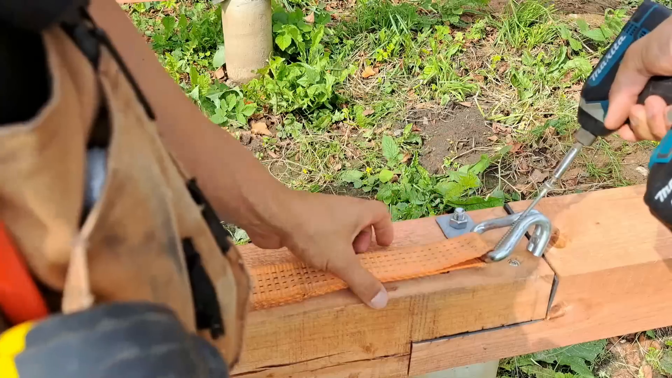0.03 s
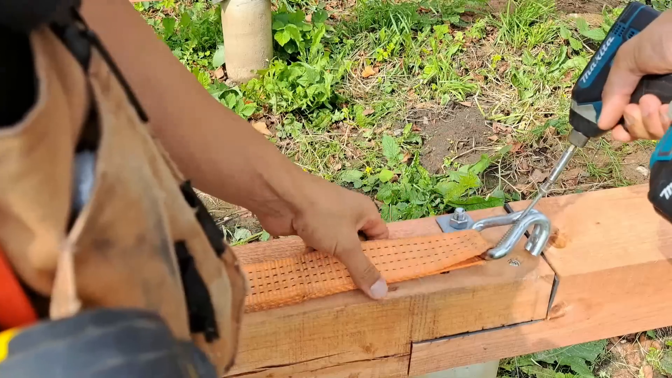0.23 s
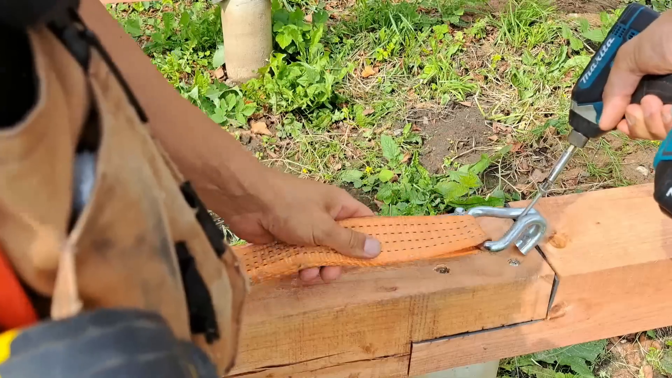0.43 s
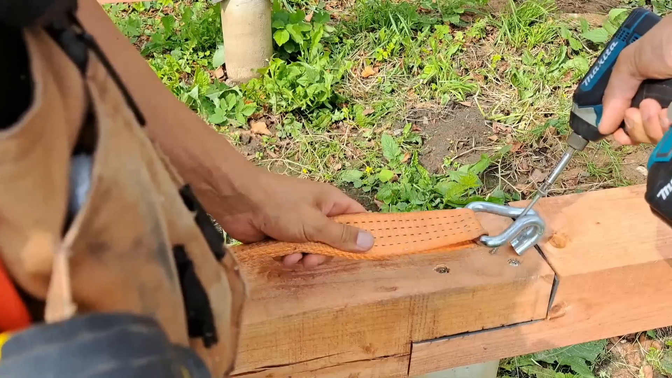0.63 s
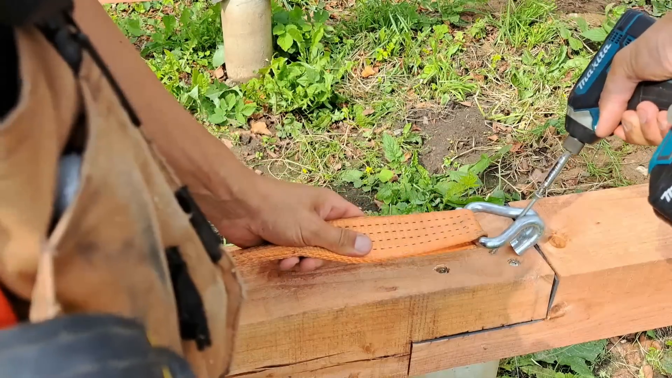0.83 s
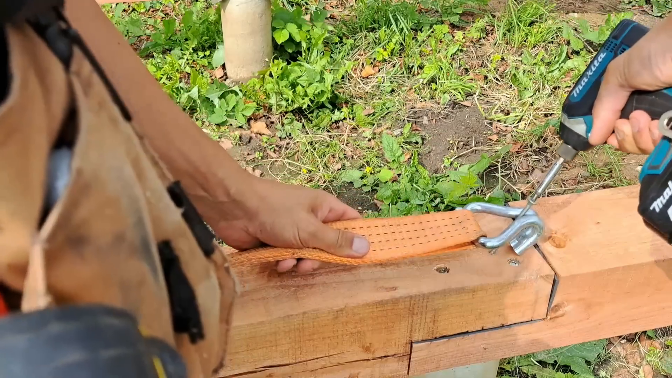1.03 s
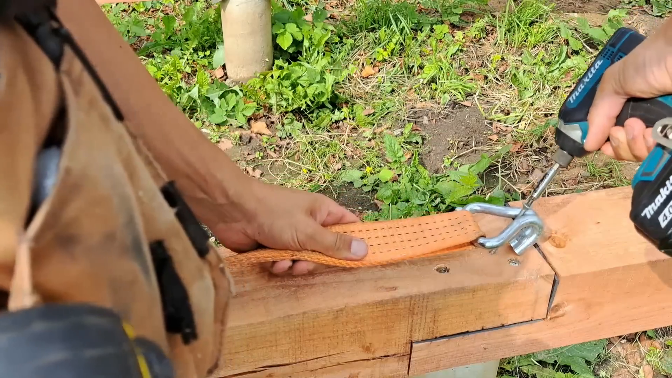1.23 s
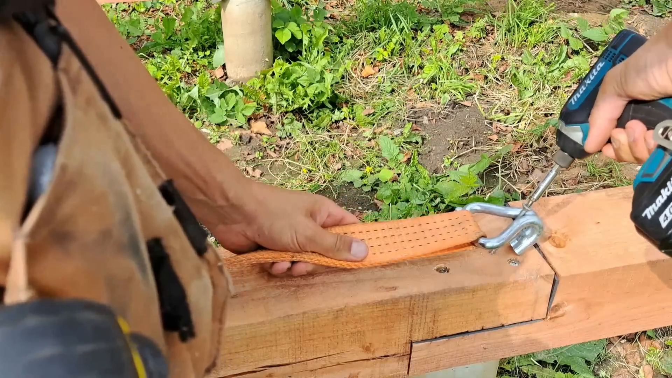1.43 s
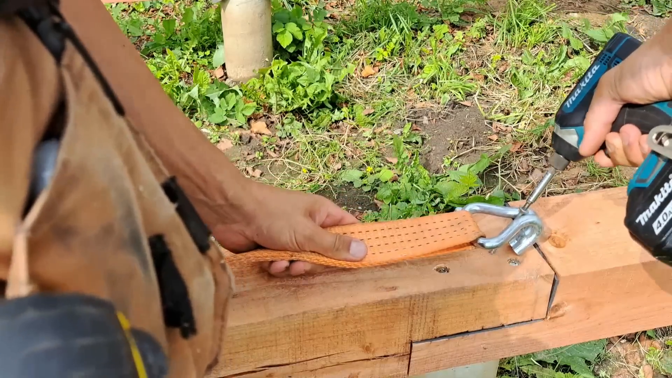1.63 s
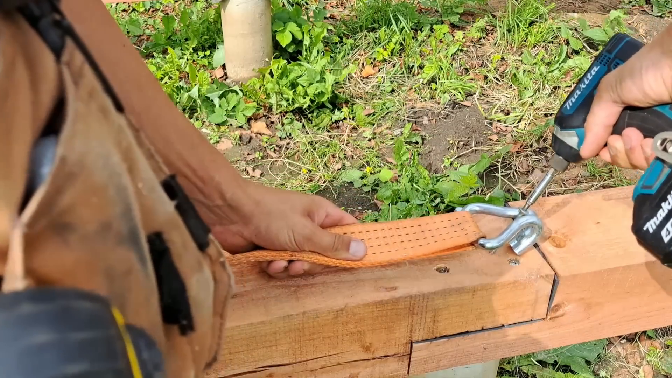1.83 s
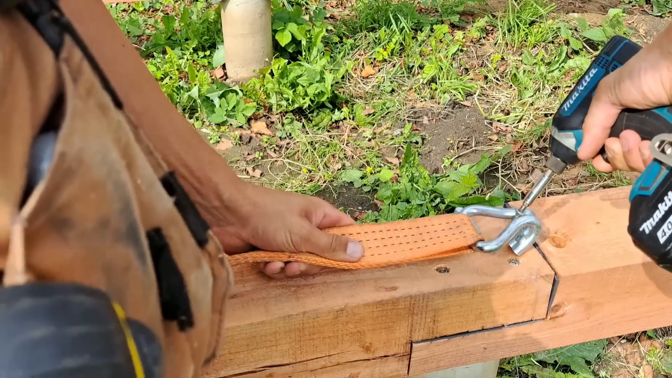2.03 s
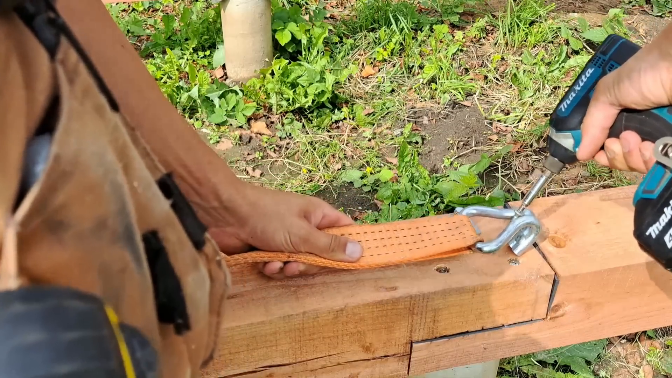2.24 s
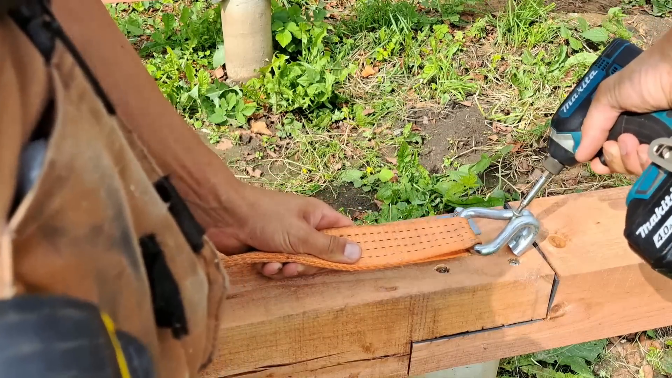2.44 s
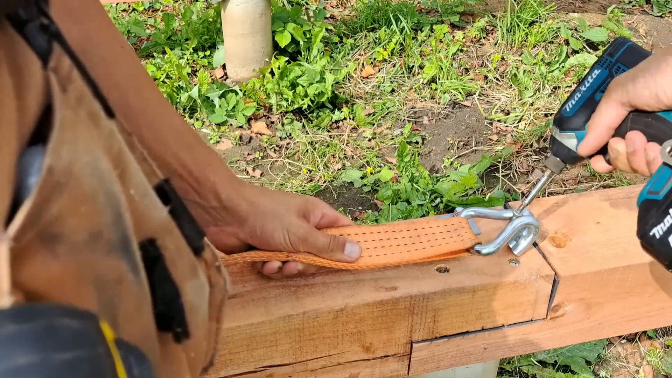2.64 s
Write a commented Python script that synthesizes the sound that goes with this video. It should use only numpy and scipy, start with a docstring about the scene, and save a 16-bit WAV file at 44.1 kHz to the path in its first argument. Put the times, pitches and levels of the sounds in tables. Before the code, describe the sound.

An impact driver works on a steel strap hook on timber, close and dry outdoors. Low rumble and thin hiss first, a brief free-spin whine near 0.2-0.3 s, thuds and a clink near 0.45. Fast metallic hammering with gear grind bursts at 0.5-0.66, 0.8-1.42, 1.57-1.76, 1.9-2.05 and 2.27-2.42 s. The beam knocks at starts and stops; faint coasting ticks fade by 2.6.

```python
"""First comes a low outdoor rumble with a thin hiss (shaped noise) and a very brief gear sound.
Then a cordless impact driver is pulsed on a steel strap hook on a timber beam, close to a two-port microphone.
Its hammer hits the anvil about 37 times a second (short noise crashes) over gear grind (patchy noise).
The bit jolts the beam as bursts start and stop (noise through resonances); the loose hook clinks (tones).
The tool ticks faintly as it coasts and whines in one free spin; wind and soft thuds rumble underneath."""
import sys
import numpy as np
from scipy import signal
from scipy.fft import rfft, irfft, next_fast_len
from scipy.io import wavfile
from scipy.ndimage import uniform_filter1d, map_coordinates

SR = 44100
rng = np.random.default_rng(int(sys.argv[2]) if len(sys.argv) > 2 else 0)


def generate_wav(sig):
    """Save sig (samples, or channels by samples) to the path in sys.argv[1] as 16-bit PCM at SR."""
    pcm = np.round(np.clip(np.atleast_2d(sig).T, -1, 1) * 32767).astype(np.int16)
    wavfile.write(sys.argv[1], SR, pcm)


def gain_from_decibels(decibels):
    """Convert decibel values to linear amplitude factors."""
    exponent = np.asarray(decibels, float) / 20
    return 10 ** exponent


N = 119070  # length [samples]

# wind rumble before the left-right trim: (time [s], level [dB])
WIND_LEVEL = [(0, -56), (.45, -38.5), (1.0, -52), (1.85, -60), (2.3, -50), (2.7, -63)]
# tone colour of the wind: (frequency [Hz], gain [dB])
WIND_COLOUR = [(12, -43), (30, -14.5), (55, 1.5), (120, -2), (300, -7.5), (900, -29.5), (2000, -91.5)]
WIND_LUMPS_DB, WIND_LEAN_DB, WIND_ALIKE = 3, -8, .2  # lean: left minus right; likeness 0 to 1
# tone colour of the thin hiss: (frequency [Hz], gain [dB])
HISS_COLOUR = [(300, 3.5), (1200, -6), (8000, -12.5), (16000, -21)]
# loudness of the hiss: (time [s], level [dB])
HISS_LEVEL = [(0, -53), (1.5, -51.5), (2.7, -65.5)]

# stretches in which the gears turn under load: (start [s], end [s], level [dB])
LOADED_STRETCHES = [(0.498, 0.662, -26.5), (0.797, 1.425, -28.5), (1.566, 1.762, -30),
                    (1.909, 2.048, -29.5), (2.272, 2.402, -29)]
# duller stretches in which the gears only coast: (start [s], end [s], level [dB])
COASTING_STRETCHES = [(0, .004, -34.5), (0.66, .79, -37), (2.427, 2.56, -49)]
SPIN_UP_DB_PER_S, SPIN_DOWN_DB_PER_S = 1015, 704.5
IDLE_TOP_HZ = 3500  # the coasting gears get duller around here
# tone colour of the gear grind: (frequency [Hz], gain [dB])
GRIND_COLOUR = [(180, -24), (300, 0.5), (1200, 1), (3000, 6.5), (7000, -8), (9400, -14), (13000, -4),
                (16200, -17.5)]
# tone colour of the free motor's whirr and of the ticks: (frequency [Hz], gain [dB])
WHIRR_COLOUR = [(180, -26), (330, -3), (1200, -6), (2600, 1.5), (8000, -10.5), (14000, -12.5),
                (16200, -18.5)]
# one short free spin of the motor: (time [s], whine pitch [Hz], whirr level [dB])
FREE_SPIN = [(.172, 520, -54), (.207, 720, -30), (.25, 1200, -27), (.28, 1270, -27), (.31, 1150, -28),
             (.345, 900, -54)]
# tones that make up the whine: (multiple of the pitch [count], level against the whirr [dB])
WHINE_TONES = [(1, -10), (2, -9)]

# ringing of the timber: (frequency [Hz], width [Hz], gain [dB]), lowest first
BEAM_MODES = [(325, 38, 1), (510, 75, -4), (700, 45, 0), (965, 50, -4), (1165, 52, -1), (1650, 130, -8),
              (2170, 150, -8)]
# jolts into the beam, from the bit and from a handling tap: (time [s], upper modes' level [dB], lowest mode's
# level [dB])
BEAM_JOLTS = [(.036, -64, -43), (.403, -37, -40), (0.5, -16.5, -24), (0.618, -40, -17.5),
              (0.649, -23, -26.5), (0.797, -23, -31), (1.349, -14, -21.5), (1.401, -30.5, -26),
              (1.563, -25, -26), (1.73, -12.5, -22), (1.905, -32, -30.5), (2.021, -23.5, -32),
              (2.269, -28, -26), (2.386, -19.5, -27)]
JOLT_S, JOLT_LOW_S = 0.016, 0.041  # length of the push on the upper modes and on the lowest
GRIND_IN_BEAM_DB, BLOW_IN_BEAM_DB = -14.5, -21

# small clinks of the hook: (time [s], level [dB], pitch [Hz])
HOOK_CLINKS = [(.149, -31, 4700), (.4075, -35.5, 5010), (.446, -23.5, 4740), (2.209, -39.5, 4730)]
CLINK_T60_S = .009  # time to fall by 60 dB

# soft low thuds of handling and gusts, before the left-right trim: (middle [s], level [dB], pitch [Hz])
THUDS = [(0.251, -37, 80), (.31, -40, 60), (0.369, -31.5, 100), (.395, -25, 403), (.416, -26, 298),
         (0.434, -20, 190), (.45, -27, 70), (.81, -35.5, 70), (1.22, -40, 50), (1.319, -35, 55),
         (1.418, -36, 61), (1.761, -40, 60), (2.09, -39.5, 65.4), (2.325, -37, 55), (2.481, -35, 70)]
THUD_CYCLES = .9  # sets the length at 60 Hz; higher thuds last more cycles

# single hammer blows on the anvil, before the hammer trim: (time [s], level [dB])
SINGLE_BLOWS = [(0.5047, -11), (0.5134, -13), (0.5216, -8), (0.5486, -9), (0.578, -8.5), (0.605, -5),
                (0.6491, -16.5), (.661, -30), (0.785, -13.5), (0.8045, -9), (0.8125, -3.5), (0.8371, -6),
                (1.3532, -12.5), (1.3607, -10.5), (1.3967, -11), (1.4065, -13), (1.4247, -23.5),
                (1.545, -23), (1.5641, -9), (1.5745, -5.5), (1.5992, -8.5), (1.6241, -9.5), (1.6505, -10.5),
                (1.677, -6.5), (1.706, -5.5), (1.729, -10.5), (1.737, -14.5), (1.7562, -17),
                (1.9026, -20.5), (1.922, -10.5), (1.947, -10), (1.9732, -8), (1.9977, -9), (2.0252, -9.5),
                (2.0437, -18.5), (2.268, -15.5), (2.2827, -8), (2.3087, -9), (2.334, -8), (2.3563, -4.5),
                (2.277, -15), (2.385, -9.5), (2.4215, -15)]
# one long even run of blows, before the hammer trim: (level [dB])
RUN_LEVELS = [-8, -8.5, -5.5, -5, -5.5, -7, -6, -13, -6, -10, -9.5, -12.5, -9, -8, -8, -7.5, -7.5, -5]
RUN_START_S, RUN_GAP_S = .8652, .02741
# tone colour of the struck steel: (frequency [Hz], gain [dB])
STEEL_COLOUR = [(600, -28.5), (1960, -0.5), (3890, -1), (4840, -4.5), (7020, -1), (8270, -6), (11700, 0),
                (16000, -8.5)]
# resonances of the hook: (frequency [Hz], width [Hz], gain [dB])
HOOK_MODES = [(4896, 67, 4), (5034, 290, 13), (6616, 54, 6)]
HAMMER_TRIM_DB = -2
BLOW_RISE_S, BLOW_T60_S = .0014, .012
AFTER_DB, AFTER_T60_S = -16, .04  # weaker, longer tail of each blow
BLOW_COLOUR_DB, SPIKY_DB = 3, 2  # random patches of colour, and fast random level changes
RATTLES_PER_S, RATTLE_SPREAD_DB, RATTLE_DB = 800, 2.5, -6  # loose steel chatters under load
# ticks while the tool coasts, before the hammer trim:
# (start [s], ticks [count], first gap [s], level [dB], fade per tick [dB])
TICK_TRAINS = [(.6875, 7, .0129, -24, .8), (1.487, 4, .014, -40, 0), (2.432, 11, .0123, -31, 1.1)]
GAP_GROWS_S, TICK_T60_S = .0003, .009  # each gap is this much longer than the last

# likeness of the two sides of the tool's noises: (frequency [Hz], likeness [0 to 1])
SIDES_ALIKE = [(300, 1), (700, 0.65), (2000, 0.89), (6000, 0.18)]
# balance of the tool: (frequency [Hz], left minus right [dB])
TOOL_LEAN = [(300, -0.5), (1400, -1), (3000, -2)]
LEFT_LAG_S = .000116  # the tool reaches the left port later
ROOM_DB, ROOM_T60_S = -16, .08
TOP_HZ = 15850


def unit(x):
    """Scale to rms 1."""
    return x / np.sqrt(np.mean(x ** 2) + 1e-20)


def along(points, hz):
    """Read (frequency, value) points on a log frequency axis."""
    f, v = np.transpose(points)
    return np.interp(np.log(hz + 1), np.log(f + 1), v)


def coloured(points):
    """Turn (frequency, gain in dB) points into a gain for any frequency."""
    return lambda hz: gain_from_decibels(along(points, hz))


def curves(rows):
    """Give one value per sample for each column after the time."""
    s, *cols = np.transpose(rows)
    return [np.interp(np.arange(N) / SR, s, c) for c in cols]


def wobble(rate):
    """Draw a smooth random curve with rate knots a second."""
    knots = rng.standard_normal(int(N * rate / SR) + 4)
    return map_coordinates(knots, [np.arange(N) * rate / SR])


def filtered(x, response):
    """Shape x by a gain, possibly complex, that depends on frequency."""
    m = next_fast_len(N + 8192)
    return irfft(rfft(x, m) * response(np.fft.rfftfreq(m, 1 / SR)), m)[..., :N]


def modes(table):
    """Response of resonances, with alternating sign, that ring only after they are pushed."""
    def response(f):
        return sum((-1) ** k * gain_from_decibels(db) * 1j * f * width / (centre ** 2 - f * f + 1j * f * width)
                   for k, (centre, width, db) in enumerate(table))
    return response


def noise(gain, patchy_db=0):
    """Two partly alike noises of rms 1, with a colour and random patches in time and frequency."""
    z = signal.stft(rng.standard_normal((2, N)), nperseg=128)[2]
    field = uniform_filter1d(rng.standard_normal(z.shape[1:]), size=3, axis=0)
    field = uniform_filter1d(field, size=5, axis=1)
    pair = signal.istft(z * gain_from_decibels(patchy_db * unit(field)), nperseg=128)[1][:, :N]

    def mid_and_side_gain(hz):
        angle = np.arccos(np.clip(along(SIDES_ALIKE, hz), -1, 1)) / 2
        return gain(hz) * [np.cos(angle), np.sin(angle)]
    mid, side = filtered(pair, mid_and_side_gain)
    return unit(np.array([mid + side, mid - side]))


def strikes(rows, shape):
    """Loudness curve with one copy of shape at each (time, level)."""
    train = np.zeros(N)
    for s, db in rows:
        train[min(round(s * SR), N - 1)] += gain_from_decibels(db)
    return signal.fftconvolve(train, shape)[:N]


def burst(rise_s, t60_s):
    """A quick smooth rise and an exponential fall."""
    t = np.arange(SR // 8) / SR
    rise = np.sin(np.pi / 2 * np.clip(t / rise_s, 0, 1)) ** 2
    return rise * gain_from_decibels(-60 * np.maximum(t - rise_s, 0) / t60_s)


def swells(rows):
    """Loudness curve of half-sine swells at (time, level, length)."""
    t = np.arange(N) / SR
    return sum(gain_from_decibels(db) * np.sin(np.pi * np.clip((t - s) / length, 0, 1)) for s, db, length in rows)


def turning(rows):
    """Gear level: ramps up before each stretch, holds, runs down after it."""
    t = np.arange(N) / SR
    levels = []
    for start, end, db in rows:
        before = SPIN_UP_DB_PER_S * np.maximum(start - t, 0)
        after = SPIN_DOWN_DB_PER_S * np.maximum(t - end, 0)
        levels.append(gain_from_decibels(db - before - after))
    return np.max(levels, axis=0)


def blows():
    """List all hammer blows as (time, level): the single ones, then the even run."""
    return SINGLE_BLOWS + [(RUN_START_S + k * RUN_GAP_S, db) for k, db in enumerate(RUN_LEVELS)]


def outdoors():
    """Lumpy wind rumble and thuds, stronger on the right port, and a thin hiss, stronger on neither."""
    level_db, = curves(WIND_LEVEL)
    shared, *own = rng.standard_normal((3, N))
    raw = np.sqrt(WIND_ALIKE) * shared + np.sqrt(1 - WIND_ALIKE) * np.array(own)
    colour = coloured(WIND_COLOUR)
    push = gain_from_decibels(level_db + WIND_LUMPS_DB * wobble(7.7))
    wind = filtered(push * raw, colour) / np.std(filtered(raw, colour))
    hiss = unit(filtered(rng.standard_normal((2, N)), coloured(HISS_COLOUR)))
    trim = gain_from_decibels(1.5 + np.array([[.5], [-.5]]) * WIND_LEAN_DB)
    return trim * (wind + thuds()) + gain_from_decibels(curves(HISS_LEVEL)[0]) * hiss


def motor():
    """Gears grind as patchy noise, duller when coasting; the free motor whirrs with a faint broken whine."""
    pitch_hz, whirr_db = curves(FREE_SPIN)
    t = np.arange(N) / SR
    free = gain_from_decibels(whirr_db) * (t > FREE_SPIN[0][0]) * (t < FREE_SPIN[-1][0])
    turn = 2 * np.pi * np.cumsum(pitch_hz * (1 + 0.017 * wobble(200.5))) / SR
    whine = sum(gain_from_decibels(db + 5 * wobble(50)) * np.sin(k * turn) for k, db in WHINE_TONES)
    whirr = gain_from_decibels(1.5 * wobble(120)) * noise(coloured(WHIRR_COLOUR), patchy_db=1.5)
    roughness = unit(gain_from_decibels(2 * wobble(120) + 2.5 * wobble(700)))
    grind = roughness * noise(coloured(GRIND_COLOUR), patchy_db=3)
    idle = unit(filtered(grind, lambda hz: 1 / (1 + (hz / IDLE_TOP_HZ) ** 1.5)))
    return turning(LOADED_STRETCHES) * grind + turning(COASTING_STRETCHES) * idle + free * (whirr + whine)


def beam():
    """The timber rings under jolts, blows and grind; its lowest mode takes longer pushes."""
    steady = gain_from_decibels(GRIND_IN_BEAM_DB) * turning(LOADED_STRETCHES + COASTING_STRETCHES)
    steady = steady + gain_from_decibels(BLOW_IN_BEAM_DB) * strikes(blows(), burst(BLOW_RISE_S, 0.068))
    upper = swells([(s, db, JOLT_S) for s, db, low_db in BEAM_JOLTS])
    lowest = swells([(s, low_db, JOLT_LOW_S) for s, db, low_db in BEAM_JOLTS])
    raw = noise(np.ones_like)
    ring = filtered((steady + upper) * raw, modes(BEAM_MODES[1:]))
    ring = ring - filtered((steady + lowest) * raw, modes(BEAM_MODES[:1]))
    return ring / np.std(filtered(raw, modes(BEAM_MODES)))


def clinks():
    """The loose hook rings briefly: two fading tones with a little noise."""
    out, t = np.zeros(N + SR), np.arange(SR // 20) / SR
    for s, db, hz in HOOK_CLINKS:
        ring = np.sin(2 * np.pi * hz * t) + .7 * np.sin(2.2 * np.pi * hz * t)
        ring = ring + .12 * rng.standard_normal(len(t))
        out[round(s * SR):][:len(t)] += gain_from_decibels(db) * burst(.001, CLINK_T60_S)[:len(t)] * ring
    return out[:N]


def thuds():
    """Each thud is a short low tone, a little out of step at the two ports."""
    t, out = np.arange(N) / SR, 0
    for s, db, hz in THUDS:
        turns = (t - s) * hz
        phase = 2 * np.pi * rng.random() + rng.normal(0, 1.2, (2, 1))
        fade = np.exp(-(2 * turns / (THUD_CYCLES * np.sqrt(hz / 60))) ** 2)
        out = out + gain_from_decibels(db) * fade * np.sin(2 * np.pi * turns + phase)
    return out


def hammer():
    """Each blow is a short spiky steel crash with chatter between; coasting ticks are small and shorter."""
    ticks = []
    for start, count, gap, db, fade in TICK_TRAINS:
        for k in range(int(count)):
            s = start + k * gap + GAP_GROWS_S * k * (k - 1) / 2
            ticks.append((s, db - fade * k + rng.normal(0, 1.5)))
    shape = burst(BLOW_RISE_S, BLOW_T60_S) + gain_from_decibels(AFTER_DB) * burst(BLOW_RISE_S, AFTER_T60_S)
    short = burst(BLOW_RISE_S / 2, TICK_T60_S)

    def steel(hz):
        return gain_from_decibels(along(STEEL_COLOUR, hz)) * np.abs(1 + modes(HOOK_MODES)(hz))
    spikes = unit(gain_from_decibels(SPIKY_DB * wobble(1500)))
    crash = strikes(blows(), shape) * spikes * noise(steel, BLOW_COLOUR_DB)
    hits = rng.random(N) < RATTLES_PER_S / SR
    sizes = gain_from_decibels(RATTLE_SPREAD_DB * rng.standard_normal(N))
    chatter = signal.fftconvolve(hits * sizes, short)[:N]
    rattle = gain_from_decibels(RATTLE_DB) * turning(LOADED_STRETCHES) * chatter * noise(steel, BLOW_COLOUR_DB)
    ticking = strikes(ticks, short) * noise(coloured(WHIRR_COLOUR), patchy_db=2)
    return gain_from_decibels(HAMMER_TRIM_DB) * (crash + rattle + ticking)


def scene():
    """The tool sits a little to the right; nearby timber and ground answer briefly."""
    tool = motor() + beam() + clinks() + hammer()
    tail = rng.standard_normal((2, SR // 8)) * burst(0.0019, ROOM_T60_S)
    answer = signal.fftconvolve(tool, tail / np.linalg.norm(tail[0]), axes=1)[:, :N]
    tool = tool + gain_from_decibels(ROOM_DB) * answer
    half = np.array([[.5], [-.5]])  # left, right

    def placing(hz):
        return gain_from_decibels(half * along(TOOL_LEAN, hz)) * np.exp(-2j * np.pi * hz * half * LEFT_LAG_S)
    return outdoors() + filtered(tool, placing)


def roll_off(x):
    """The treble ends steeply here."""
    return signal.sosfilt(signal.butter(12, 16520, fs=SR, output="sos"), x)


def record(dry):
    """Peaks clip at full scale and the top of the treble is cut."""
    mix = filtered(np.clip(dry, -1, 1), lambda hz: hz < TOP_HZ)
    return roll_off(mix)


dry = scene()
out = record(dry)
generate_wav(out)
```